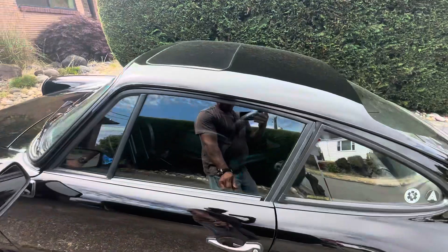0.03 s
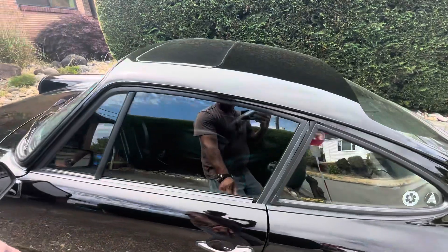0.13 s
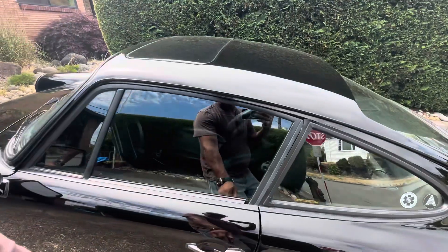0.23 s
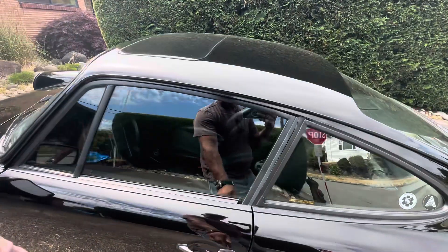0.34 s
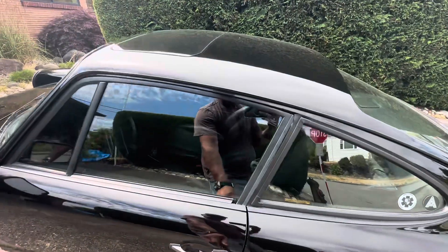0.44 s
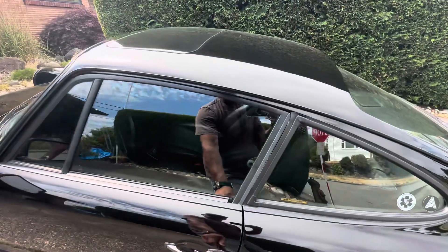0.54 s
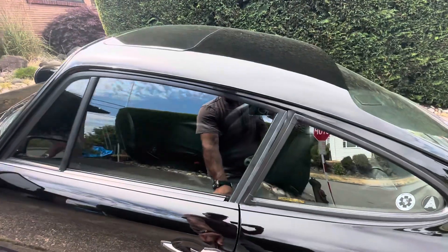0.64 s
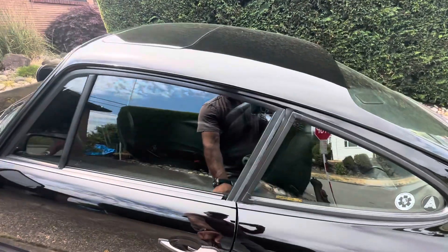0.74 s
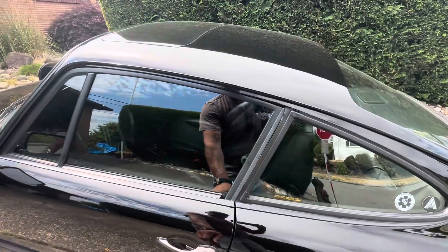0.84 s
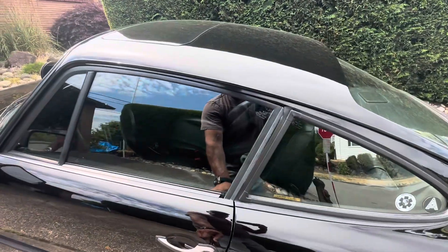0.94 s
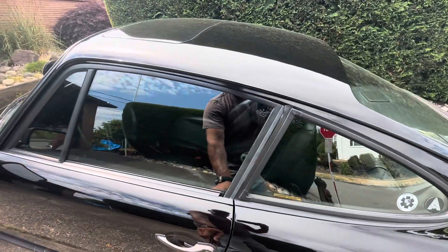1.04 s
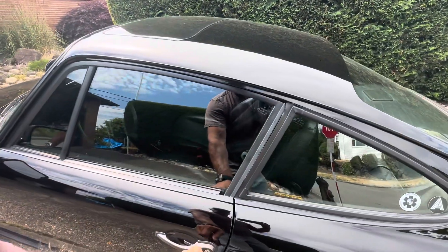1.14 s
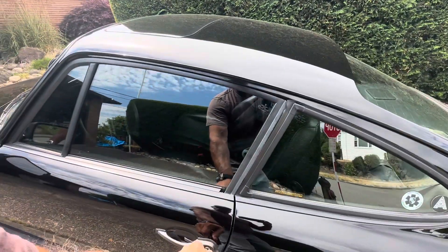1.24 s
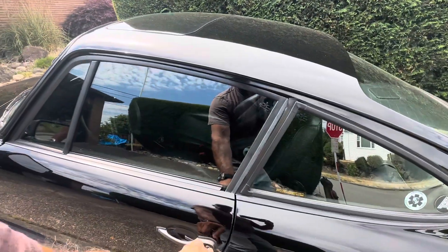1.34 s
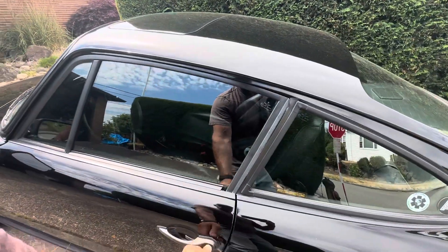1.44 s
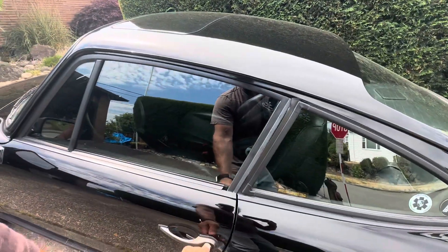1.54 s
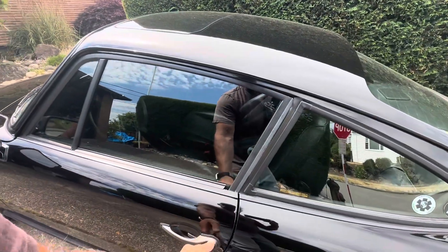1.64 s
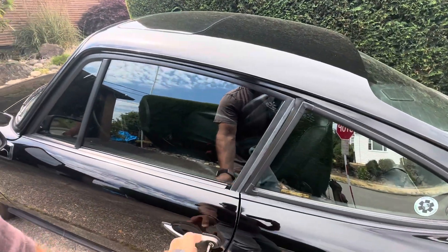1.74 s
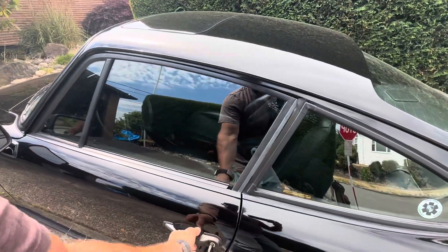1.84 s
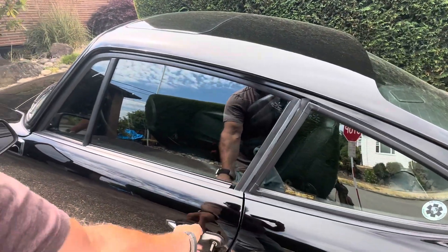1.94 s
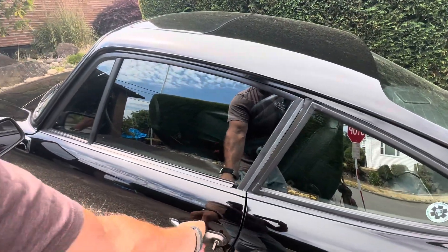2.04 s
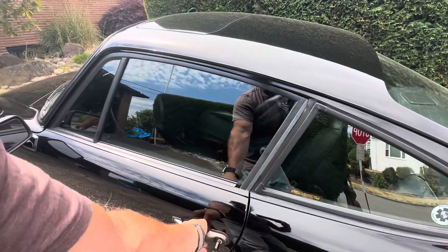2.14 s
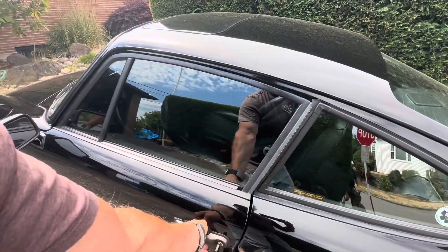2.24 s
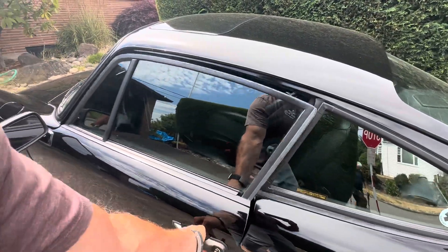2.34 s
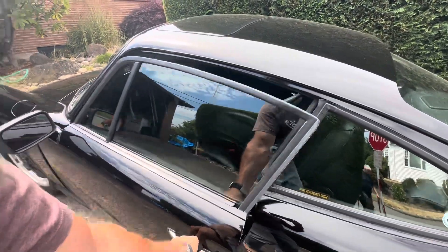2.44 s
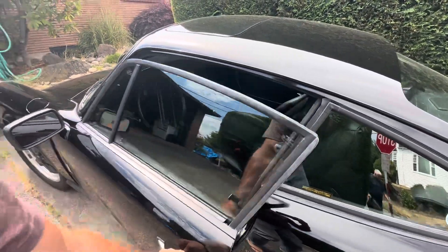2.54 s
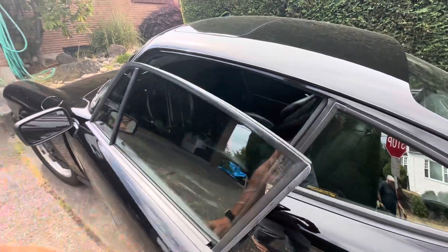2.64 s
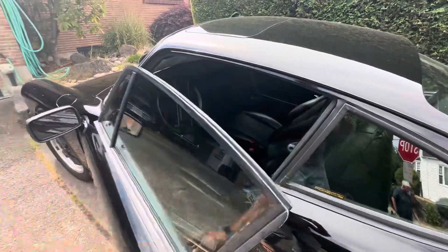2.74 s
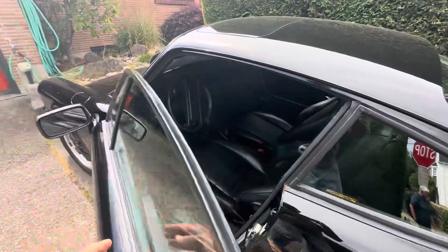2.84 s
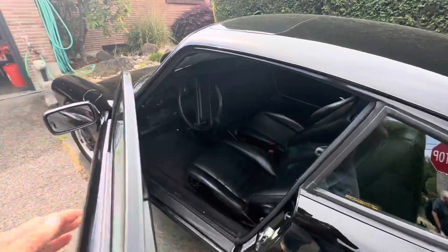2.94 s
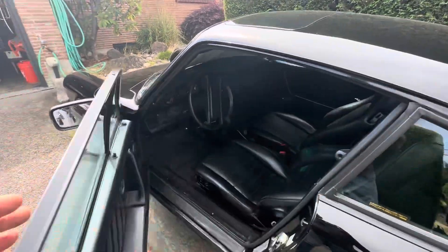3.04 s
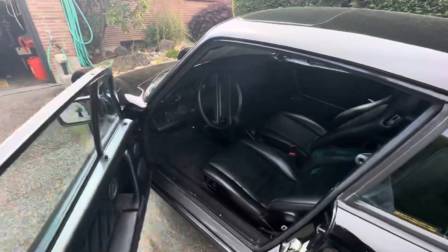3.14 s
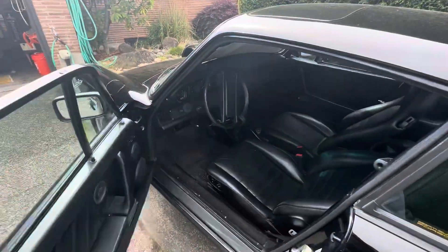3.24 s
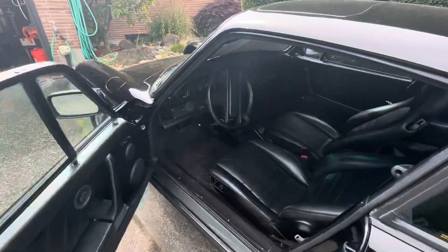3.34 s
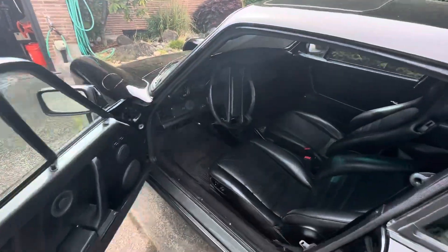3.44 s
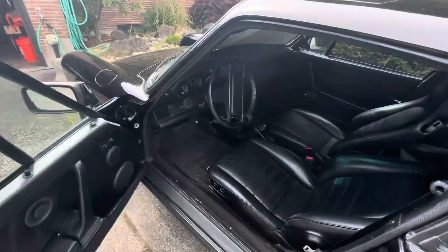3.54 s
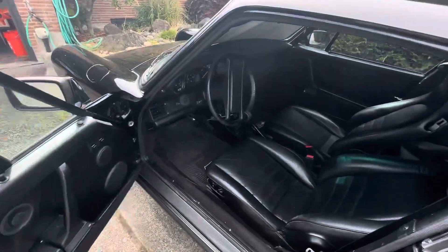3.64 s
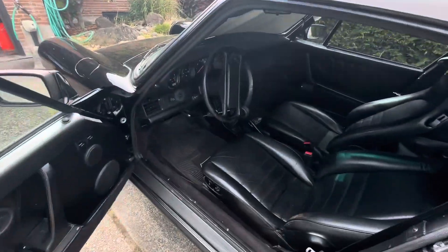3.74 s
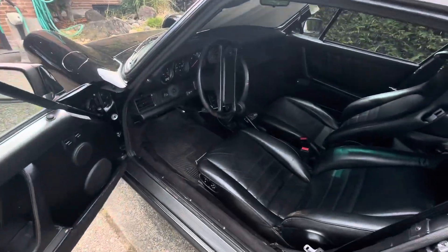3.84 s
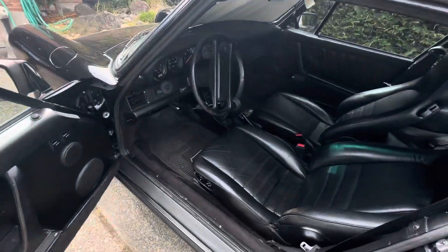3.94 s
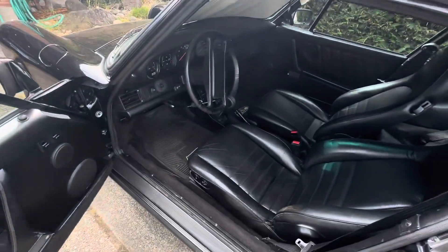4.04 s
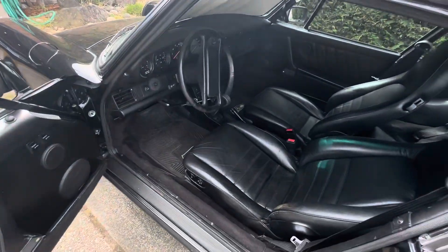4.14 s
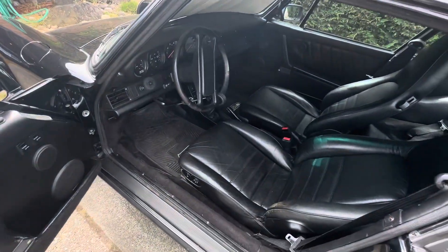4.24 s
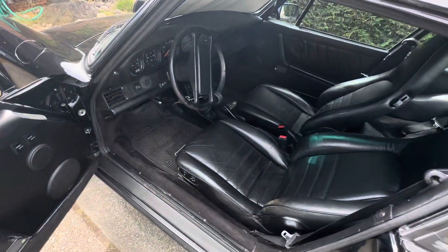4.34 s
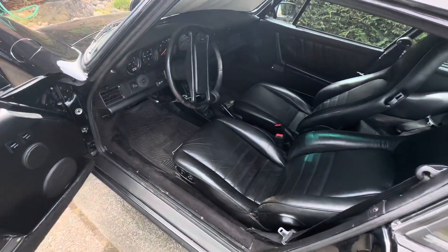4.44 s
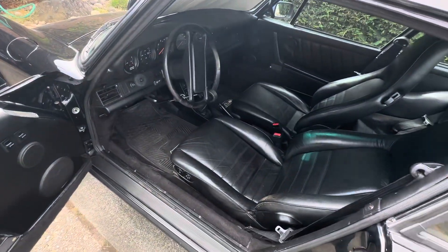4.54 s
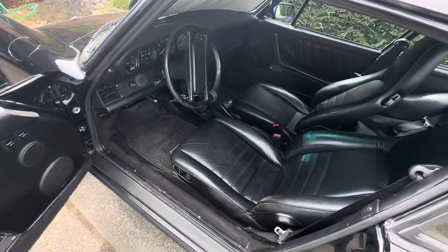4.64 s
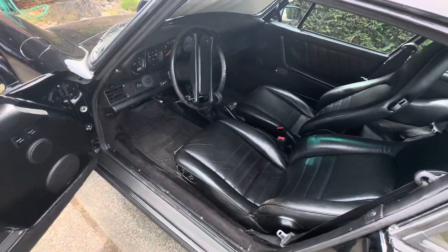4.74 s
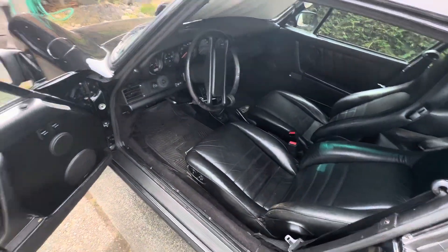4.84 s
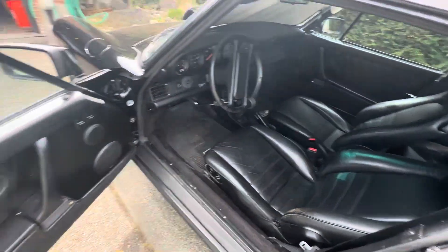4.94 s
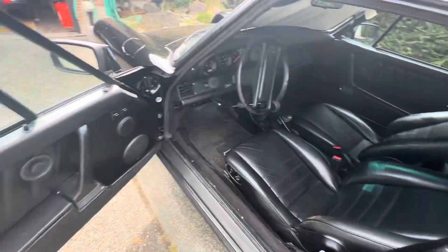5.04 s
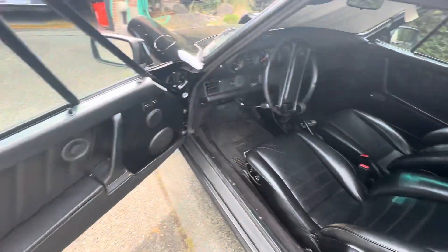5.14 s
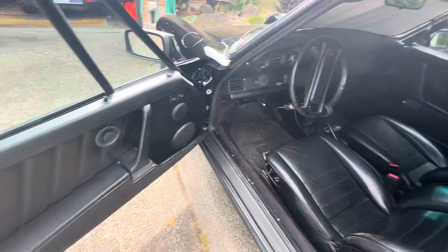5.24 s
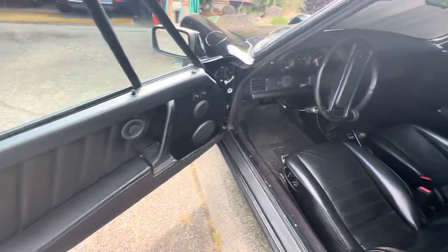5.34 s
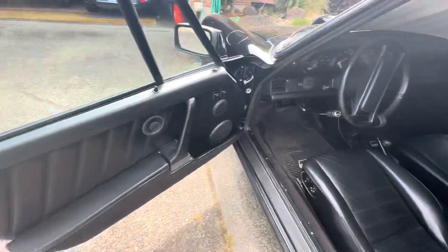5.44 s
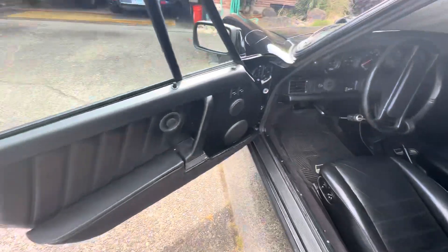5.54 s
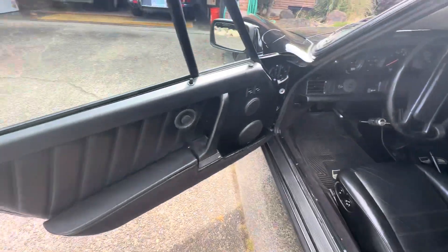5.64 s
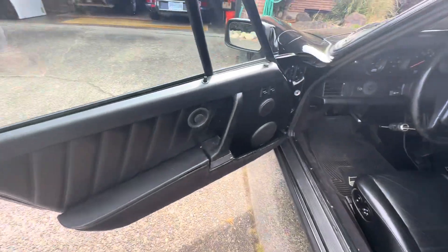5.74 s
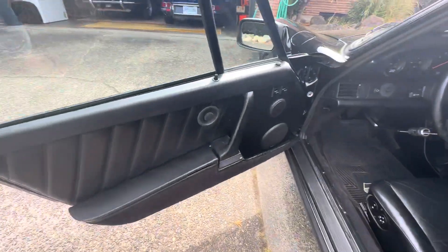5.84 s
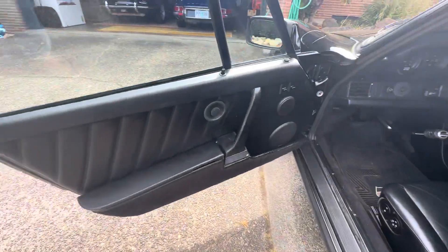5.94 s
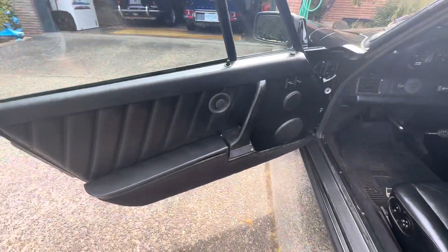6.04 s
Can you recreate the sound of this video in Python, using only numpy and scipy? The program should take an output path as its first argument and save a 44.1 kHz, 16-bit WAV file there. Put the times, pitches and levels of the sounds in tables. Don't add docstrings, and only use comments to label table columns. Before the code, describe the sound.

Outdoors, close stereo microphone, dry, with faint low traffic and a little leafy hiss throughout. At 0.0-0.1 s fingers click on trim; a sole scuffs near 0.3, and light hand taps come at 0.5 and 0.7. From 1.0 a key touches the lock with thin, very high chimes; at 1.45-1.5 it goes home with strong clicks and a hollow panel knock. Turning clicks and jingles cluster at 1.6-1.85. The handle rattles from 1.97, a deep jolt comes at 2.2 and a sharp latch crack at 2.26. At 2.64 the door clicks free and slides with a soft hiss, snapping at 2.9; trim snaps at 3.33. At 3.74 it hits its stop, the loudest bright clank with a thud, rebounding at 3.85. A faint ratcheting hinge creak slows over 4.2-4.6. Gritty soles scuff at 5.2-5.55; a soft push thuds at 5.83, then light taps and a final scuff until 6.1.

```python
import sys
import numpy as np
from scipy import signal
from scipy.io import wavfile
from scipy.ndimage import uniform_filter1d

SR = 44100
rng = np.random.default_rng(int(sys.argv[2]) if len(sys.argv) > 2 else 0)


def bounce(signal):
    frames = np.transpose(np.atleast_2d(signal))
    limited = np.clip(frames, -1, 1)
    pcm = np.round(limited * 32767).astype(np.int16)
    wavfile.write(sys.argv[1], SR, pcm)


def invert_db(x):
    u = np.asarray(x, float) / 20
    return 10 ** u


N = 268128

# t/s, level/dB
STREET = [(0, -50), (.95, -52), (1.15, -45.5), (1.4, -52.5), (1.6, -46.5), (1.8, -51), (2.45, -52.5),
          (2.85, -54), (3.9, -52.5), (4.15, -56), (4.4, -51), (4.84, -56), (5.4, -52), (6.08, -52.5)]
# f/Hz, level per Hz/dB
RUMBLE = [(15, -27), (25, -15), (48, -3), (65, -1), (108, -3), (146, -10.5), (177, -10.5), (206, -11),
          (231, -19), (260, -20), (340, -18.5), (570, -120)]
MURMUR = [(120, -49.5), (200, -10.5), (609, -14.5), (853, -21), (1160, -26.5), (1500, -44), (1950, -42),
          (3300, -120)]
AIR = [(900, 9.5), (1300, 3.5), (2200, 5), (3000, -7), (4500, -8.5), (7000, -7.5), (9500, -11.5),
       (11000, -26)]
# f/Hz, likeness/1
LIKENESS = [(40, 0.72), (80, 1), (130, 0.9), (290, 1), (640, 0.98), (1400, -0.34), (8000, 0.71)]
# t/s, length/s, level/dB
BODY_HUMS = [
    (.5, 0.71, -62),
    (1.1, 0.032, -54),
    (1.5, 0.09, -49),
    (1.75, 0.56, -57),
    (2.65, 0.24, -56.5),
]
# t/s, length/s, f/Hz, level/dB, glide/(Hz/s)
SQUEALS = [(0.53, 0.35, 1765, -69, 0), (2.42, 0.56, 6100, -70, 100), (2.65, .3, 8900, -72, -300),
           (2.7, .25, 9600, -74, 200), (4.42, 0.25, 4150, -79, -400), (4.47, 0.2, 6150, -80, -2500),
           (4.1, 0.58, 2000, -79.5, 0), (4.55, 0.24, 8750, -77, -700), (4.52, .12, 13200, -81, -3000),
           (4.73, .02, 4000, -73, 0), (4.79, .03, 7350, -78, -500), (5.76, .08, 2200, -72, 0),
           (4.62, .15, 9700, -80, 1500), (.62, .08, 3650, -78, 0)]
SLIPS = [4.229, 4.243, 4.265, 4.2767, 4.2905, 4.3068, 4.3193, 4.338, 4.3542, 4.372, 4.39, 4.41, 4.4288,
         4.4534, 4.4847, 4.553]
# t/s, level/dB
DRAG = [
    (4.18, -84),
    (4.3, -68),
    (4.55, -72),
    (4.82, -82),
    (5.05, -99.5),
]
# f/Hz, level/dB, t60/s
HINGE = [(641, -5, .06), (807, -5, .08), (1810, -9, .02), (2300, 4, .03), (2440, 3, .02), (2700, -6, .012),
         (3400, -7, .014), (3800, -6, .014), (4240, -6, .016), (6000, -19, .012), (7320, -20, .008)]
# t/s, level/dB
HAZE = [
    (4.25, -94),
    (4.45, -74.5),
    (4.6, -76),
    (4.8, -82),
    (4.9, -88),
]
# low f/Hz, high f/Hz, level/dB
HAZE_TOP = (11000, 12100, 22)
# t/s, level/dB, top octave level/dB
SWING = [
    (2.36, -60.5, -76),
    (2.45, -71.5, -91),
    (2.55, -70, -80),
    (2.7, -59.5, -72),
    (2.92, -60, -69),
    (3.0, -68.5, -92),
    (3.15, -66, -92),
    (3.32, -73, -95),
]
# f/Hz, width/Hz, level/dB
STAY = [(1560, 1300, -9.5), (4600, 1900, -7), (5850, 700, -7), (7500, 600, -7), (8700, 650, -7)]
# t/s, length/s, low level/dB, middle level/dB, bright level/dB
SOLES = [(0.28, 0.075, -70, -57, -85), (0.305, 0.053, -48.5, -57, -75), (3.942, 0.027, -42.5, -54.5, -63),
         (3.99, 0.029, -57, -67, -89), (5.196, 0.043, -54, -60.5, -72), (5.258, 0.026, -51, -55, -70),
         (5.3, .03, -59, -57, -65), (5.325, 0.052, -48, -58.5, -65), (5.39, .02, -52, -75, -82),
         (5.445, 0.012, -46.5, -58, -82), (5.508, 0.045, -54, -65.5, -74), (5.555, 0.066, -72, -76, -90),
         (5.84, 0.14, -64, -69, -81), (6.021, 0.093, -59, -63, -77)]
RUBS = [(.01, 0.11, -82, -64.5, -81.5), (.705, 0.082, -67, -64.5, -82), (1.04, 0.089, -68, -59.5, -64.5),
        (1.14, 0.11, -76, -66.5, -75), (1.385, 0.068, -53.5, -64, -73), (1.484, 0.036, -40.5, -53, -90),
        (1.575, 0.059, -55.5, -61.5, -68), (1.63, 0.048, -54, -46.5, -60), (1.677, 0.023, -46, -42, -39),
        (1.73, 0.059, -59, -50, -55.5), (1.81, 0.2, -62, -63.5, -62.5), (1.96, 0.069, -48.5, -56, -55.5),
        (2.06, 0.29, -62, -64, -68), (2.185, 0.045, -41, -55, -68), (2.27, 0.12, -51, -74, -69),
        (3.34, 0.068, -62, -59.5, -80), (3.45, 0.21, -64.5, -67.5, -91), (3.79, 0.046, -56.5, -62, -86),
        (3.727, 0.02, -57, -58.5, -79), (4.855, 0.047, -79, -65, -86)]
# t/s, f/Hz, level/dB, t60/s
KEYS = [(.985, 13650, -56, 0.21), (1.015, 13600, -50, 0.44), (1.146, 13600, -47, 0.26),
        (1.149, 6000, -57.5, 0.31), (1.575, 13600, -44, .12), (1.574, 8100, -45, 0.09),
        (1.783, 7000, -41, 0.12), (1.786, 8050, -47, .1), (1.672, 9900, -40, .1), (1.92, 6100, -54, .15),
        (2.147, 7200, -50, .08), (2.222, 9700, -46, .1), (2.357, 9500, -50, .04), (2.498, 8500, -56, .04),
        (2.498, 9600, -57, .05), (1.81, 13680, -52, 1), (2.501, 13750, -47, 0.063),
        (2.019, 13800, -34, 0.052), (2.292, 9600, -44, 0.12), (1.74, 13600, -46, .2),
        (1.98, 13700, -42, .25)]
# t/s, peak level/dB, f/Hz, t60/s
THUMPS = [
    (1.029, -28, 99.5, 0.1),
    (1.512, -24, 84, 0.29),
    (1.535, -19, 173, 0.083),
    (2.209, -21.5, 65, 0.28),
    (2.225, -22.5, 194, 0.11),
    (2.638, -39, 138, 0.17),
    (3.758, -18.5, 207, 0.057),
    (3.78, -22, 84, 0.051),
    (4.419, -56, 185, 0.074),
    (5.825, -22.5, 60.6, 0.04),
]
# t/s, peak level/dB, f/Hz, t60/s
NOTCH = [
    (2.901, -17.5, 1580, 0.0053),
    (2.907, -40.5, 1800, 0.081),
    (2.908, -26, 1330, 0.012),
    (2.924, -43, 1650, 0.06),
    (3.945, -36.5, 1356, 0.072),
    (3.962, -43, 1630, 0.089),
]
# t/s, peak level/dB, f/Hz, t60/s
PINGS = [(0.697, -36, 2236, 0.037), (1.494, -22, 4900, .025), (1.7429, -30, 1105, 0.056),
         (1.744, -31, 1470, 0.04), (1.781, -33, 4200, .05), (2.222, -36, 8400, .03),
         (2.2585, -26, 5560, .03), (3.739, -23.5, 4700, 0.044), (3.743, -24, 4075, 0.055),
         (3.7415, -25, 6940, .03), (3.853, -29, 4060, 0.034), (3.859, -42, 722, .07),
         (3.902, -40, 3480, .03), (1.729, -18, 4200, 0.019), (2.103, -26.5, 4450, 0.016),
         (3.746, -24, 4500, .05), (3.744, -22, 6000, .07), (3.744, -32, 2370, .045),
         (3.743, -28, 1970, 0.034), (3.745, -37, 2869, .06), (3.75, -32, 572, 0.19)]
# f/Hz, level/dB, t60/s, build-up of the bending wave/s
SKIN = [(241.7, -10, 0.11, 0.008), (283.6, 2.5, 0.047, 0.0075), (347.8, -10, 0.14, 0.0004),
        (403.5, -9, 0.12, 0.0046), (499, -23, 0.043, 0.013), (513, -2, 0.067, 0.00099),
        (583.7, -4, 0.14, 0.00035), (661.4, -2.5, 0.097, 0.00067), (716, -3, 0.11, 0.0017),
        (792, -6.5, 0.12, 0.00045), (942, -14.5, 0.06, 0.0014)]
# t/s, upper modes level/dB, lower modes level/dB, damping factor/1
KNOCKS = [(0.075, -34, -43, 2.8), (0.504, -60, -45.5, 1), (0.7, -69, -43, 1.4), (0.978, -43, -38.5, 0.85),
          (1.024, -50, -46.5, 1.4), (1.123, -37.5, -35.5, 0.9), (1.185, -36.5, -45.5, 0.8),
          (1.273, -44, -38, 2.1), (1.407, -34, -31.5, 1.74), (1.452, -19, -21.5, 2.2),
          (1.463, -29.5, -32.5, 0.49), (1.4951, -18.5, -20, 1.8), (1.628, -21.5, -24.5, 0.68),
          (1.743, -20.5, -29, 1.36), (1.837, -35, -40, 5), (1.975, -29.5, -27.5, 1.2),
          (2.026, -37.5, -33.5, 1.1), (2.168, -35.5, -36.5, 0.47), (2.224, -33, -36, 0.56),
          (2.263, -26, -35, 1.23), (2.31, -36.5, -48, 0.67), (2.637, -34.5, -30.5, 1.3),
          (3.742, -20.5, -29.5, 0.88), (3.853, -43.5, -55, 0.48), (3.858, -32.5, -57, 1.1),
          (5.847, -37.5, -39, 4), (1.507, -16, -20.5, 2), (1.524, -29.5, -29, 0.87)]
# crest t/s, level/dB, f/Hz, spread/s, left minus right/dB
WAVES = [
    (1.4998, -9, 606, 0.0023, 10),
    (1.5115, -16.5, 420, 0.0019, 5),
    (1.634, -19.5, 562, 0.0037, 6.5),
    (2.1838, -16.5, 80, 0.0035, -0.5),
    (2.652, -29, 301, 0.0085, 2),
    (5.851, -43.5, 513, 0.0043, 2),
    (3.748, -25.5, 660, 0.0045, -1),
]
# t/s, crack level/dB, dull level/dB, clank level/dB, rattle t60/s
LOCK_HITS = [(0.9727, -36.5, -55, -51, 0.017), (0.9765, -46.5, -45, -31, 0.025),
             (1.022, -48.5, -58, -42, 0.052), (1.12, -61, -41.5, -18.5, 0.016),
             (1.143, -34, -60, -82, 0.034), (1.182, -42, -36.5, -27, 0.031), (1.27, -38.5, -53, -31, 0.031),
             (1.392, -33.5, -48, -23, 0.038), (1.4477, -23.5, -21, -15.5, 0.013),
             (1.492, -13.5, -23, -27, 0.028), (1.6242, -36.5, -37, -29, 0.1),
             (1.6541, -27, -45, -45, 0.024), (1.6687, -25.5, -54, -32.5, 0.071),
             (1.7276, -15, -50, -26, 0.017), (1.7397, -28, -32, -25, 0.077), (1.7763, -26, -46, -39, 0.021),
             (1.8313, -42, -49, -43, 0.065)]
LATCH_HITS = [(1.967, -28, -39, -31, 0.049), (1.973, -23, -34.5, -20, 0.053),
              (2.024, -39, -50, -33.5, 0.13), (2.1008, -34, -77, -39, 0.012), (2.167, -40, -46, -40, 0.044),
              (2.204, -25, -42, -47, 0.048), (2.218, -25, -32, -26, 0.027), (2.2561, -7.5, -29, -18, 0.027),
              (2.272, -23, -36.5, -22, 0.029), (2.297, -34, -43, -32, 0.036),
              (2.3088, -19, -37, -18.5, 0.028), (2.6321, -19.5, -39.5, -27.5, 0.067),
              (2.905, -68, -38, -18.5, 0.0049), (3.7391, -6.5, -28.5, -4, 0.029),
              (3.8482, -19.5, -29, -19, 0.0095), (4.395, -48.5, -69, -69, 0.059),
              (5.46, -42.5, -62, -39, 0.079), (2.6532, -32, -42.5, -22, 0.031),
              (3.757, -19, -28.5, -13, 0.02)]
SOFT_HITS = [
    (0.011, -28.5, -48, -31.5, 0.017),
    (0.0718, -44, -38, -32.5, 0.024),
    (0.501, -35, -56, -48, 0.024),
    (0.695, -31.5, -44.5, -30, 0.037),
    (1.4772, -30, -53, -40, 0.045),
    (3.327, -18, -39.5, -37, 0.015),
    (4.843, -44.5, -59.5, -40.5, 0.085),
    (5.8689, -40, -38.5, -37.5, 0.016),
]
# t/s, crack level/dB
TICKS = [(1.4107, -32), (1.588, -41), (1.6115, -47), (1.854, -52), (1.911, -37), (1.9505, -42),
         (2.149, -49), (2.177, -38), (.279, -39), (.309, -47), (.33, -34), (3.53, -46), (3.59, -38),
         (5.191, -46), (5.452, -42), (5.506, -57), (2.3605, -38), (2.384, -58), (2.497, -42), (3.061, -40),
         (3.272, -44), (3.462, -45), (3.537, -39), (3.577, -39.5), (3.6232, -34.5), (3.9, -33),
         (4.081, -39.5), (4.1024, -35), (4.16, -49), (5.199, -53), (5.2215, -44), (5.244, -44),
         (5.259, -36), (5.277, -41), (5.301, -36), (5.321, -35.5), (5.339, -24), (5.364, -43),
         (5.379, -33.5), (5.8504, -40.5), (5.951, -55), (6.025, -54)]
# f/Hz, level/dB, t60/s
PLATE = [(1140, 1, 0.057), (1463, -3.5, 0.071), (2030, -2.5, 0.056), (2290, 0, 0.085), (2956, -19, 0.057),
         (4075, -19, 0.085), (4324, -8, 0.039), (5405, -31, 0.35), (6510, -4.5, 0.062),
         (8450, -15.5, 0.075), (8800, -20.5, 0.064), (9200, -10.5, 0.044)]
# f/Hz, level/dB, t60/s
BARREL = [(2204, 2, 0.021), (2440, -14, 0.068), (2850, -18, 0.04), (4550, -13, 2.4), (5270, -9.5, 0.015),
          (5620, -14.5, 0.094), (5720, -20, 0.05), (6830, -14, 0.21), (7300, -27, 0.11), (8400, -21, 0.15)]

LEFT_LEAD_S = .00032


def rms_one(x):
    return x / np.sqrt(np.mean(x ** 2) + 1e-20)


def in_time(rows, silent=None):
    s, *columns = np.transpose(rows)
    t = np.arange(N) / SR
    return np.array([np.interp(t, s, column, silent, silent) for column in columns])


def at_hz(points, hz):
    points = np.array(points)
    return np.interp(np.log(hz), np.log(points[:, 0]), points[:, 1])


def since(s):
    t = np.arange(N) / SR
    which = np.clip(np.searchsorted(s, t) - 1, 0, None)
    return which, np.clip(t - s[which], 0, None)


def band(x, low_hz, high_hz):
    sos = signal.butter(2, [low_hz, high_hz], "band", fs=SR, output="sos")
    return signal.sosfilt(sos, x + 1e-18)


def drift(rate_hz):
    r = np.exp(-80 * np.pi * rate_hz / SR)
    white = rng.standard_normal(N // 40 + 2002)
    slow = signal.lfilter([1], [1, -2 * r, r * r], white)[2000:]
    return np.interp(np.arange(N) / 40, np.arange(len(slow)), rms_one(slow))


def strokes(rows, rise_db_per_s, fall_db_per_s):
    t, out = np.arange(N) / SR, -120.0
    for s, length, *levels_db in rows:
        rise = rise_db_per_s * (t - s)
        fall = fall_db_per_s * (s + length - t)
        shape_db = np.minimum(0, np.minimum(rise, fall))
        out = np.maximum(out, shape_db + np.array(levels_db)[:, None])
    return out


def ring(force, hz, t60, lead_rad):
    r = invert_db(-60 / (t60 * SR))
    pole = r * np.exp(2j * np.pi * hz / SR)
    z = signal.lfilter([np.sqrt(2 - 2 * r * r)], [1, -pole], force + 1e-18)
    z = band(z, hz / 1.5, hz * 1.5)
    return np.array([(z * np.exp(1j * lead_rad)).real, z.real])


def dying_tones(rows, rise_s, lead_s):
    out, age = np.zeros((2, N + SR)), np.arange(SR) / SR
    for s, db, hz, t60 in rows:
        at = round(s * SR)
        shape = invert_db(db - 60 * age / t60) * (1 - np.exp(-age / rise_s))
        out[:, at:at + SR] += shape * np.sin(2 * np.pi * hz * (age + [[lead_s], [0]]))
    return out[:, :N]


def grains(per_s, spread_db):
    sizes = invert_db(spread_db * np.minimum(rng.exponential(1, N), 4)) * rng.choice([-1, 1], N)
    return rms_one(sizes * (rng.random(N) < per_s / SR))


def shards(force, levels_db, colour_db, alike):
    out, edges = np.zeros((2, N)), np.geomspace(850, 16500, 19)
    unlike = np.sqrt(1 - alike ** 2) * abs(force) * rng.choice([-1, 1], N)
    pair = np.array([force, alike * force + unlike])
    flips = rng.choice([-1, 1], (2, N))
    for k, (low, high) in enumerate(zip(edges, edges[1:])):
        place = np.interp(np.log(low * high) / 2, np.log([1200, 2200, 5200, 14000]), [0, 1, 2, 2.999])
        below, share = int(place), place % 1
        db = levels_db[below] * (1 - share) + levels_db[below + 1] * share
        excited = pair * flips[k % 2] * invert_db(db + colour_db[k])
        left, right = band(excited, low, high) * np.sqrt(SR / 8 / (high - low))
        lag = rng.integers(4, 22) if low > 1400 else 19
        if low < 10000:
            right = np.roll(right, lag)
        else:
            right = 0.23 * left + 0.5 * right
        out += [left, right]
    return out


def banded_noise(spectrum, patchy_db):
    top, bottom = spectrum[-1][0], spectrum[0][0]
    edges = np.geomspace(20, 16000, 30)
    out, white = 0, rng.standard_normal((3, 2, N + 8000))
    for k, (low, high) in enumerate(zip(edges, edges[1:])):
        hz = np.sqrt(low * high)
        if .8 * bottom < hz < 1.2 * top:
            sos = signal.butter(2, [low, high], "band", fs=SR, output="sos")
            mid, side = signal.sosfilt(sos, white[k % 3])[:, 8000:]
            alike = np.clip(at_hz(LIKENESS, hz), -1, 1)
            gain = invert_db(at_hz(spectrum, hz) + patchy_db * drift(12.1))
            out = out + gain * (np.sqrt(1 + alike) * mid + np.sqrt(1 - alike) * side * [[1], [-1]])
    return rms_one(out)


def street():
    rumble_db, = in_time(STREET)
    swell_db = rumble_db - rumble_db.mean()
    hum_db = strokes(BODY_HUMS, rise_db_per_s=70, fall_db_per_s=22)[0]
    murmur_db = np.maximum(-63 + swell_db, hum_db + [[2.5], [-2.5]])
    rumble = invert_db(rumble_db + 5.0) * banded_noise(RUMBLE, patchy_db=0.5)
    murmur = invert_db(murmur_db + 6.0) * banded_noise(MURMUR, patchy_db=2.5)
    air = invert_db(-63.5 + 0.34 * swell_db) * banded_noise(AIR, patchy_db=2.2)
    left, right = rumble + murmur + air
    return np.array([left, np.roll(right, 20)])


def squeals():
    out, t = 0, np.arange(N) / SR
    for s, length, hz, db, glide in SQUEALS:
        level_db, = strokes([(s, length, db)], rise_db_per_s=350, fall_db_per_s=350)
        pitch = hz * (1 + .008 * drift(12)) + glide * np.clip(t - s, -.1, length + .1)
        turn = 2 * np.pi * np.cumsum(pitch) / SR + [[rng.uniform(-1, 1)], [0]]
        width_hz = .014 * hz
        narrow = drift(width_hz) * np.cos(turn) + drift(width_hz) * np.sin(turn)
        out = out + invert_db(level_db + 5 * drift(11.7)) * narrow
    return out


def hinge():
    s = np.array(SLIPS)
    db = -51.5 - 9.5 * np.exp((s[0] - s) / 0.099)
    which, age = since(s)
    bursts = (age > 0) * invert_db(db[which] - 19.0 - 60 * age / 0.0085)
    drag = invert_db(in_time(DRAG, silent=-200)[0])
    force = (bursts + drag) * rng.standard_normal(N)
    force[(s * SR).astype(int) + 1] += invert_db(db + 17.0)
    return sum(invert_db(g) * ring(force, hz, t60, rng.uniform(-2.8, 1)) for hz, g, t60 in HINGE)


def swing():
    white = rng.standard_normal((2, N))
    hiss = 0
    for hz, width, db in STAY:
        hiss = hiss + invert_db(db + 1.6 * drift(17.0)) * rms_one(band(white, hz - width / 2, hz + width / 2))
    level_db, top_db = in_time(SWING, silent=-100)
    top = rms_one(band(white[0], 12600, 15400))
    low_hz, high_hz, haze_top_db = HAZE_TOP
    haze_top = white[1]
    for _ in range(3):
        haze_top = band(haze_top, low_hz, high_hz)
    haze = rms_one(band(white, 7000, 10400)) + invert_db(haze_top_db) * rms_one(haze_top)
    haze = haze * invert_db(in_time(HAZE, silent=-120)[0] + 3.7 * drift(11.0))
    return invert_db(level_db + 6.0) * rms_one(hiss) + invert_db(top_db + 4.5 + 2.2 * drift(14.0)) * top + haze


def scuffs():
    rubs = strokes(RUBS, rise_db_per_s=608.5, fall_db_per_s=496)
    soles = strokes(SOLES, rise_db_per_s=1200, fall_db_per_s=791)
    low, middle, bright = np.maximum(rubs, soles)
    levels = np.array([low - 3, low - 1.5, middle + 0.22, bright + 11.0])
    levels = 20 * np.log10(uniform_filter1d(invert_db(levels), size=300, axis=1) + 1e-9)
    grit = grains(4000, 3.0) * invert_db(3.2 * drift(60))
    colour_db = 3.5 * np.array([drift(30) for k in range(18)])
    return shards(grit, levels, colour_db, alike=.75)


def keys():
    return dying_tones([(s, db, hz, t60) for s, hz, db, t60 in KEYS], 0.0013, .00002)


def thumps():
    high = [row for row in THUMPS if row[2] > 120]
    low = [row for row in THUMPS if row[2] <= 120]
    return dying_tones(high, 0.0013, 0.00045) + dying_tones(low, 0.0016, 0.00064)


def notch_and_pings():
    return dying_tones([*NOTCH, *PINGS], .0012, .00008)


def bending_waves():
    t = np.arange(N) / SR + [[LEFT_LEAD_S], [0]]
    out = 0
    for s, db, hz, spread, pan_db in WAVES:
        gain = invert_db(db + np.array([[pan_db / 2], [-pan_db / 2]]))
        out = out + gain * np.exp(-((t - s) / spread) ** 2 / 2) * np.cos(2 * np.pi * hz * (t - s))
    return out


def door_skin():
    out, age = np.zeros((2, N)), np.arange(SR // 4) / SR
    luck = rng.standard_normal((len(KNOCKS), len(SKIN), 3))
    for (s, upper_db, lower_db, damping), draws in zip(KNOCKS, luck):
        at = round(s * SR)
        for (hz, db, t60, late), (strong, tune, phase) in zip(SKIN, draws):
            level_db = (upper_db - 2.5 if hz > 490 else lower_db + 10) + db + 3 * strong
            shape = invert_db(level_db - 60 * age * damping / t60) * (1 - np.exp(-age / late)) ** 2
            turn = 2 * np.pi * hz * (1 + 0.028 * tune) * (age + [[LEFT_LEAD_S], [0]])
            out[:, at:at + len(age)] += (shape * np.sin(turn + 3 * phase))[:, :N - at]
    return out * invert_db([[3.0], [-3.0]])


def small_metal(force, modes, luck):
    out = 0
    for (hz, db, t60), draw in zip(modes, luck):
        struck = force * invert_db(3.3 * draw)
        out = out + invert_db(db) * ring(struck, hz, min(t60, .045), rng.uniform(-1.8, 3.6))
    return out


def contacts():
    # sparkle, the level of the top octave/dB
    rows = [(*row, -30) for row in LOCK_HITS] + [(*row, -33) for row in LATCH_HITS]
    rows += [(*row, -41) for row in SOFT_HITS]
    rows += [(s, crack, -58.5, -48.5, .016, -50) for s, crack in TICKS]
    s, crack_db, dull_db, clank_db, t60, sparkle_db = np.transpose(sorted(rows))
    sparkle_db = sparkle_db + 0.7 * crack_db
    which, age = since(s)
    rise = (1 - np.exp(-age / 0.0013)) ** 3
    fading = invert_db(-60 * age / np.clip(t60, .005, .3)[which])
    echoes = invert_db(-17 - 60 * age / .13)
    rattle = grains(10000, 3.0) * rise * (fading + echoes)
    levels = np.array([dull_db + 10.0, clank_db - 10.0, crack_db - 5, sparkle_db + 16.0])[:, which]
    luck = rng.standard_normal((len(s), 30))[which].T
    struck = rattle * invert_db(crack_db[which])
    late = s[which] > 3.6
    plate = invert_db(-10) * small_metal(struck * late, PLATE, luck)
    barrel = invert_db(-18.5) * small_metal(struck * ~late, BARREL, luck[12:])
    return plate + barrel + shards(rattle, levels, 2.2 * luck, alike=0.47)


def scene():
    background = street() + squeals() + hinge() + swing() + scuffs()
    door = thumps() + notch_and_pings() + bending_waves() + door_skin()
    return background + keys() + door + contacts()


def band_limit(x):
    return signal.sosfilt(signal.butter(12, 16980, fs=SR, output="sos"), x)


def record(dry):
    x = signal.sosfilt(signal.butter(3, 40, "high", fs=SR, output="sos"), dry)
    stop = signal.butter(4, [10450, 12800], "bandstop", fs=SR, output="sos")
    floor = invert_db(-29)
    x = signal.sosfilt(stop, x) * (1 - floor) + floor * x
    x = signal.sosfilt(signal.cheby1(10, 1, 15600, fs=SR, output="sos"), x)
    mix = .8 * np.tanh(x / .8)
    return band_limit(mix)


dry = scene()
out = record(dry)
bounce(out)
```